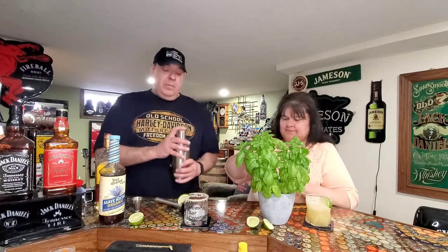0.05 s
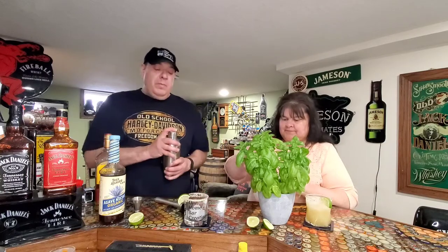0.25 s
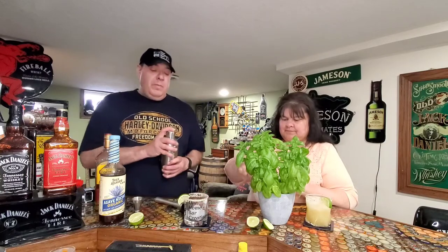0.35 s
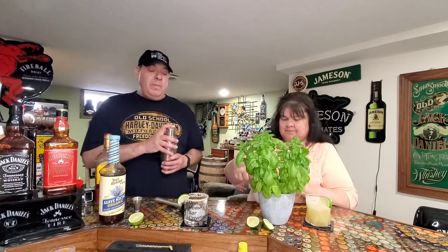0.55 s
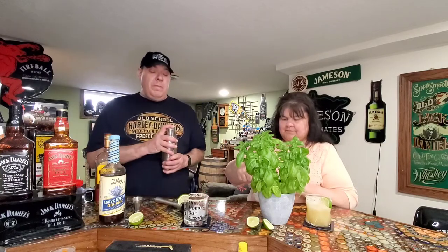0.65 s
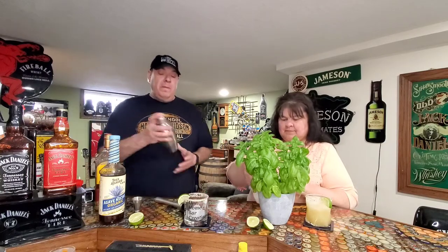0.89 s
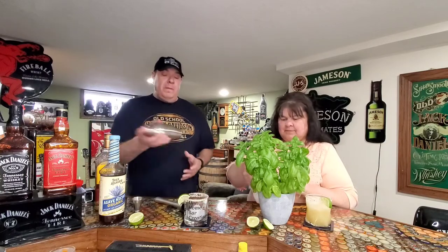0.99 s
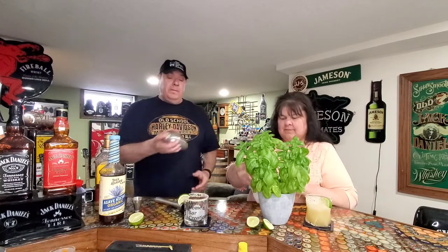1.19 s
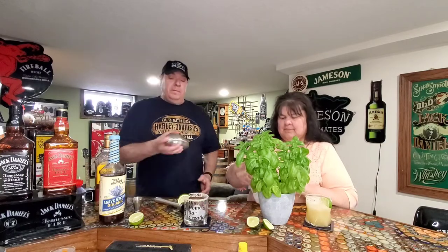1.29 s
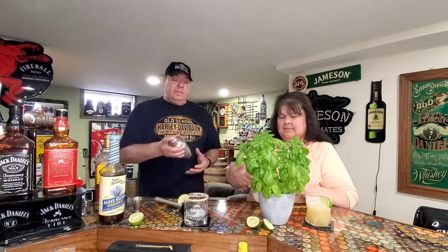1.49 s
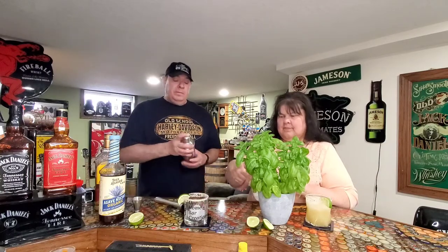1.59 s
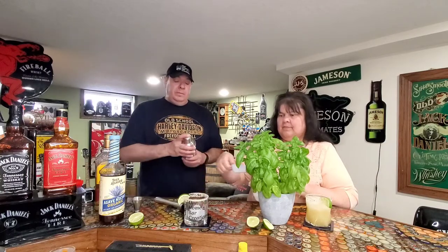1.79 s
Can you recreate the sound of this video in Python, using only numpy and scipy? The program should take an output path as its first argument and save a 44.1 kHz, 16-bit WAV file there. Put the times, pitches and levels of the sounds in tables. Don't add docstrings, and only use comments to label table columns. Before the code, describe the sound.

Ice cubes clatter and thud in a hand-held steel cocktail shaker, a dense loud bout peaking in a bright crash, then sparser knocks fading, in a low home bar, stereo microphones a few metres away.

```python
import sys
import numpy as np
from scipy import signal
from scipy.fft import rfft, irfft, next_fast_len
from scipy.io import wavfile

SR = 44100
rng = np.random.default_rng(int(sys.argv[2]) if len(sys.argv) > 2 else 0)


def voltage_ratio(decibels):
    exponent = np.asarray(decibels, float) / 20
    return 10 ** exponent


def pcm_store(signal):
    levels = np.round(np.clip(np.atleast_2d(signal), -1, 1) * 32767)
    wavfile.write(sys.argv[1], SR, levels.astype(np.int16).T)


N = 81585


def unit(x):
    return x / np.sqrt(np.mean(x ** 2) + 1e-20)


def along(points, hz):
    f, v = np.transpose(points)
    return np.interp(np.log(hz + 1), np.log(f + 1), v)


def filtered(x, response):
    m = next_fast_len(x.shape[-1] + 8192)
    spectrum = rfft(x, m) * response(np.fft.rfftfreq(m, 1 / SR))
    return irfft(spectrum, m)[..., :x.shape[-1]]


def peak(hz, centre, width):
    return 1j * hz * width / (centre ** 2 - hz ** 2 + 1j * hz * width)


def spikes(s, size):
    return np.bincount(np.clip((s * SR).astype(int), 0, N - 1), size, N)


# f/Hz, correlation
LIKENESS = [(60, 1), (130, 0.75), (290, 0.36), (640, -0.59), (1400, -0.67), (3770, -0.11), (15000, 0.083)]


def alike_pair(pair):
    def turn(hz):
        return np.arccos(np.clip(along(LIKENESS, hz), -1, 1)) / 2
    mid, side = filtered(pair, lambda hz: np.array([np.cos(turn(hz)), np.sin(turn(hz))]))
    return np.array([mid + side, mid - side])


# f/Hz, density/dB per Hz
FLOOR = [(15, -47), (25, -30), (59, -2.5), (160, -16), (400, -19.5), (1110, -23), (2550, -16), (3500, -30),
         (9500, -43), (15800, -41)]
FLOOR_DB = -54


def floor():
    noise = filtered(rng.standard_normal((2, N)), lambda f: voltage_ratio(along(FLOOR, f)))
    return voltage_ratio(FLOOR_DB) * unit(alike_pair(noise))


SLIDE_S, SLIDE_DB, SLIDE_HZ, SLIDE_WIDTH_HZ = 0.081, -62.5, 3000, 3300


def slide():
    t = np.arange(N) / SR
    hiss = unit(filtered(rng.standard_normal(N), lambda f: peak(f, SLIDE_HZ, SLIDE_WIDTH_HZ) ** 2))
    return voltage_ratio(SLIDE_DB) * hiss * (t > SLIDE_S) * (t < KNOCKS[0][0])


# t/s, effort/dB, hardness/dB
TUMBLE = [(.131, -36.5, -18), (.185, -36.5, -4), (.25, -28.5, -3), (.36, -28, -42), (.44, -37.5, -31),
          (0.538, -43, 5), (0.598, -30.5, 7), (.7, -28, -8), (.8, -29.5, -3.5), (.93, -33.5, 6.5),
          (1.027, -50.5, 22.5), (1.14, -51, 18.5), (1.27, -46.5, 12), (1.38, -36, 0), (1.5, -41.5, 11),
          (1.62, -47.5, 10.5), (1.75, -50, 3), (1.85, -52, 8)]
TUMBLE_PER_S, TUMBLE_SCATTER_DB, TUMBLE_DB = 500, 7, -2.5
# t/s, peak level/dB, depth/dB, hardness/dB
KNOCKS = [(0.132, -10, -12.5, 2), (0.19, -10.5, -8, 12), (0.221, -12, -1.5, -11), (0.284, -9, -19, 9.5),
          (0.319, -13, 8.5, -6), (0.383, -15, 9, 13), (0.43, -24, 20.5, 1), (0.47, -20, 16, -19),
          (0.556, -19.5, 15, 11), (0.603, -12, 7, -3), (0.648, -14.5, 11, -7), (0.717, -18.5, 17, 12.5),
          (0.751, -8.5, 4, 6.5), (0.769, -10.5, -13, 10.5), (0.818, -18, 19.5, -8), (0.85, -16.5, -23, 16),
          (0.86, -9.5, 9.5, 0), (0.884, -1, -11, -29), (0.918, -19, 13, 12.5), (0.982, -20, -8, 17.5),
          (1.158, -6, -4, 5), (1.19, -14, 0, 5), (1.334, -24.5, 16, -17), (1.39, -10, 2.5, 1),
          (1.409, -11.5, 0, 9.5), (1.457, -8.5, 7.5, 4), (1.533, -15.5, -13, 8), (1.48, -24, 2, -6),
          (1.682, -22, -7, 8), (1.715, -33, 23.5, 16.5), (1.794, -25.5, -0.5, 8)]
KNOCK_DB, HEAP_S = -14.5, .012
HEAP_PEAK, HEAP_FALL_DB = 0.23, 12


def contacts(count=9):
    s, db, depth, hard = np.transpose(KNOCKS)[:, :, None]
    luck = rng.random((len(KNOCKS), 2, count))
    late = luck[:, 0] ** 1.5 * (np.arange(count) > 0)
    heap_db = db + KNOCK_DB - 6 * luck[:, 1] - HEAP_FALL_DB * abs(late - HEAP_PEAK)
    heaps = np.broadcast_arrays(s + HEAP_S * late, heap_db, depth, hard)

    when, effort, hardness = np.transpose(TUMBLE)
    luck = rng.random((2000, 2))
    t = when[0] + np.cumsum(-np.log(luck[:, 0])) / TUMBLE_PER_S
    loose_db = np.interp(t, when, effort) + TUMBLE_DB + TUMBLE_SCATTER_DB * luck[:, 1] ** 2
    loose_db -= 200 * (t > N / SR)
    loose = (t, loose_db, 0 * t, np.interp(t, when, hardness))
    return [np.append(a, b) for a, b in zip(heaps, loose)]


# f/Hz, width/Hz, level/dB
SHELL = [(330, 310, -18.5), (470, 97, -12.5), (614, 15.5, -30.5), (797, 63, -7.5), (812, 54, -16),
         (927, 79, -11), (1210, 100, -7), (1351, 160, -2.5), (1590, 124, -5), (1896, 133, -5),
         (2422, 91, -10), (2620, 254, -3.5), (3000, 294, -5), (3610, 360, -10)]
MODE_SCATTER_DB, DEEP_HZ = 3, 1100
# f/Hz, density/dB per Hz
CRACK = [(150, -68), (250, -33), (348, -17), (660, -9.5), (799, -5), (1060, -8), (2380, -2.5), (4610, -15),
         (15800, -35)]
CRACK_DB, CRACK_S = -7, 0.0062


def shaker():
    s, db, depth, hard = contacts()
    size = (len(s), len(SHELL))
    mix = voltage_ratio(MODE_SCATTER_DB * rng.standard_normal(size)) * rng.choice([-1, 1], size)
    ring = np.zeros(N)
    for k, (hz, width, level) in enumerate(SHELL):
        drive_db = db + level + depth / (1 + (hz / DEEP_HZ) ** 2)
        blows = spikes(s, voltage_ratio(drive_db) * mix[:, k])
        ring += filtered(blows, lambda f: peak(f, hz, width) * SR / (2 * np.pi * width))

    t = np.arange(SR // 20) / SR
    power = signal.fftconvolve(spikes(s, voltage_ratio(2 * (db + hard))), voltage_ratio(-20 * t / CRACK_S))[:N]
    grit = unit(filtered(rng.standard_normal(N), lambda f: voltage_ratio(along(CRACK, f))))
    return ring + voltage_ratio(CRACK_DB) * np.sqrt(abs(power)) * grit


# t/s, peak level/dB, f/Hz, width/f, sizzle/dB
CLACKS = [(0.134, -21, 2380, 0.24, -27), (0.182, -32, 3820, 1.5, -8), (0.2, -18.5, 3620, 1.1, -11),
          (.201, -19.5, 1890, 0.073, -40), (.289, -12.5, 3000, 0.51, -10), (.385, -29, 4560, 1.3, -9),
          (0.429, -22.5, 4830, 0.22, -40), (.5568, -32, 4000, 0.91, -19), (.604, -18, 3000, 1.3, -15),
          (.744, -34, 3200, 0.51, -22), (.8467, -13, 2270, .5, -22), (0.862, -5.5, 2680, 0.28, -18.5),
          (0.886, -5.5, 3000, 0.74, -21), (1.144, -15, 3880, 1.2, -11), (1.263, -18.5, 3550, 1.1, -11),
          (1.393, -19.5, 2300, 1.1, -7), (1.448, -14, 4000, 0.98, -22), (1.459, -14.5, 3460, 1.1, -20),
          (1.532, -24, 6000, 1.4, 0.5), (1.5365, -10.5, 4620, 0.47, -11), (1.555, -12, 3620, 0.92, -35),
          (1.684, -31, 2430, 0.16, -24), (1.7157, -16.5, 2860, 1.8, -27)]
CRASHES = [
    (1.039, -18, 4430, 1, -6),
    (1.0432, 1, 4360, 0.46, -15.5),
    (1.057, -14.5, 4400, 0.53, -14),
    (1.078, -7, 3000, 0.31, -25),
    (1.2927, -8.5, 4500, 1, -22),
    (1.296, -11.5, 4997, 0.43, -28),
]
THUDS = [(.232, -19, 797, 0.055, -40), (.285, -19, 797, 0.1, -40), (.769, -24.5, 342, 0.47, -40),
         (.859, -13, 806, 0.043, -38), (.878, -18, 797, 0.065, -40), (1.1582, -5.5, 1224, 0.91, -30),
         (1.157, -25, 330, 0.48, -40), (1.334, -28.5, 795, 0.17, -40), (1.408, -18.5, 1100, 0.097, -40),
         (1.417, -25, 453, 0.19, -40), (1.424, -27.5, 780, 0.13, -40), (1.457, -17.5, 797, 0.13, -40),
         (1.477, -24.5, 809, 0.074, -40), (1.645, -33.5, 948, 0.083, -40), (1.668, -40, 870, 0.083, -40),
         (1.686, -41, 980, .15, -40), (1.715, -36, 1310, 0.31, -40), (1.793, -34, 914, 0.2, -40)]
# chatter level/dB, chatter fall/s, undertone fall/s (per 20 dB)
AFTER_CLACK = (-15.5, 0.018, .02)
AFTER_CRASH = (-16, 0.023, .05)
AFTER_THUD = (-19, 0.02, 0.016)
# f/Hz, level/dB
SIZZLE = [(2000, -54), (6000, -0.5), (8000, -1.5), (10000, -9.5), (13000, -1), (15700, 0)]
CLACK_DB, SNAP_S, REBOUND_DB, CHATTER_RISE_S = -3, .006, -4, 0.00069
UNDERTONE, UNDERTONE_DB, OVERTONE, OVERTONE_DB = 0.63, 2.5, 1.65, -12
SIZZLE_DB, CLACK_S, SPRAY_RISE_S = 7, .012, 0.0035


def impact(hz, share, sizzle_db, shape, sinking, t, count=5):
    puff = rng.standard_normal((3, len(t)))
    luck = rng.random(count) * (np.arange(count) > 0)

    def band(f, ratio):
        return peak(f, ratio * hz, max(share, .03) * hz) ** 2

    def colour(f):
        return band(f, 1) + voltage_ratio(OVERTONE_DB) * band(f, OVERTONE)

    blow_sizes = voltage_ratio(REBOUND_DB * (luck > 0) - 2.5 * luck)
    snap = filtered(np.bincount((luck * SNAP_S * SR).astype(int), blow_sizes, len(t)), colour)
    under = unit(filtered(puff[2], lambda f: band(f, UNDERTONE)))
    under *= voltage_ratio(UNDERTONE_DB) * min(share, 1)
    chatter = shape * unit(filtered(puff[0], colour)) + sinking * under
    spray = unit(filtered(puff[1], lambda f: voltage_ratio(along(SIZZLE, f))))
    spray *= voltage_ratio(-20 * t / CLACK_S) * (1 - np.exp(-t / SPRAY_RISE_S)) + shape
    return snap / abs(snap).max() + chatter + voltage_ratio(sizzle_db + SIZZLE_DB) * spray


def clacks():
    out, t = np.zeros(N + SR), np.arange(SR // 8) / SR
    groups = ((CLACKS, AFTER_CLACK), (CRASHES, AFTER_CRASH), (THUDS, AFTER_THUD))
    for rows, (chatter_db, chatter_s, under_s) in groups:
        rise = 1 - np.exp(-t / CHATTER_RISE_S)
        shape = voltage_ratio(chatter_db - 20 * t / chatter_s) * rise
        sinking = voltage_ratio(chatter_db - 20 * t / under_s) * rise
        for s, db, hz, share, sizzle_db in rows:
            hit = impact(hz, share, sizzle_db, shape, sinking, t)
            out[round(s * SR):][:len(t)] += voltage_ratio(db + CLACK_DB) * hit
    return out[:N]


LOW_CUT_HZ = 250


def low_cut(x):
    return signal.sosfilt(signal.butter(6, LOW_CUT_HZ, "high", fs=SR, output="sos"), x)


# f/Hz, t60/s
ROOM = [(100, 0.22), (500, 0.49), (2000, 0.36), (5000, 0.38), (12000, 0.29)]
ROOM_DB, WALLS_DB, WALLS_S, LAG_S = -1, -8, .02, .0002
HELD_S = 0.11985


def room(x, count=8):
    out, length = np.zeros((2, N + SR)), SR // 2
    where = np.arange(N) / SR / HELD_S
    for k in range(int(N / SR / HELD_S) + 2):
        hz, t, z = signal.stft(rng.standard_normal((2, length)), SR, nperseg=256)
        z = z * voltage_ratio(-60 * t / along(ROOM, hz)[:, None])
        tail = alike_pair(signal.istft(z, SR, nperseg=256)[1][:, :length])
        tail *= 1 - np.exp(-np.arange(length) / SR / 0.0089)
        answer = voltage_ratio(ROOM_DB) * tail / np.linalg.norm(tail[0])
        luck = rng.random((2, 2, count + 1))
        for ear in range(2):
            answer[ear, int(luck[ear, 0, 0] * 2 * LAG_S * SR)] += 1
            delay = .003 + WALLS_S * luck[0, 0, 1:] + 2 * LAG_S * luck[ear, 1, 1:]
            echo = voltage_ratio(WALLS_DB - 325 * delay) * np.sign(luck[1, 0, 1:] - .3)
            answer[ear, (delay * SR).astype(int)] += echo
        part = x * np.clip(1 - abs(where - k), 0, 1) ** .5
        out[:, :N + length - 1] += signal.fftconvolve(part[None], answer, axes=1)
    return out[:, :N]


# t/s, peak level/dB, f/Hz
THUMPS = [
    (0.299, -63, 97),
    (0.39, -38, 96),
    (0.457, -45, 97),
    (0.781, -40.5, 96.6),
    (0.827, -46, 96),
    (1.258, -59, 98),
    (1.406, -61, 98),
    (1.69, -50, 80),
    (1.75, -57, 60),
]
THUMP_DB, THUMP_S = 10.5, 0.051
THUMP_EDGE, THUMP_EDGE_DB = 1.74, -11.5


def thumps():
    out, t = np.zeros(N + SR), np.arange(SR // 4) / SR
    for s, db, hz in THUMPS:
        body = np.sin(2 * np.pi * hz * t) * voltage_ratio(-20 * t / THUMP_S)
        edge = np.sin(2 * np.pi * THUMP_EDGE * hz * t) * voltage_ratio(THUMP_EDGE_DB - 20 * t / 0.04)
        rise = 1 - np.exp(-t / 0.0063)
        out[round(s * SR):][:len(t)] += voltage_ratio(db + THUMP_DB) * (body + edge) * rise
    return out[:N]


def scene():
    ice = low_cut(slide() + shaker() + clacks())
    return floor() + room(ice) * voltage_ratio([[.3], [-.3]]) * 1 + thumps()


def low_pass(x):
    return signal.sosfilt(signal.butter(12, 16990, fs=SR, output="sos"), x)


CEILING, TOP_HZ = .78, 15850


def record(dry):
    held = dry / (1 + abs(dry / CEILING) ** 4) ** (1 / 4)
    return low_pass(filtered(held, lambda hz: hz < TOP_HZ))


dry = scene()
out = record(dry)
pcm_store(out)
```